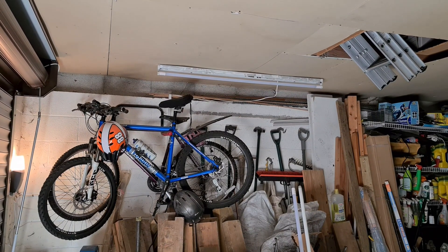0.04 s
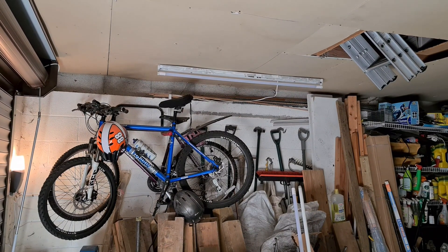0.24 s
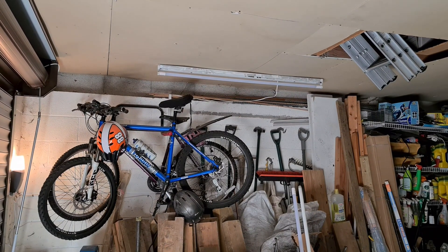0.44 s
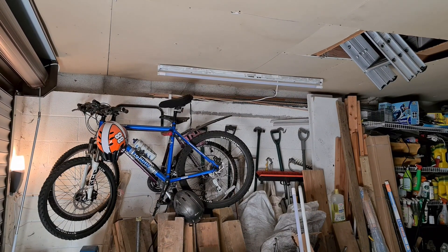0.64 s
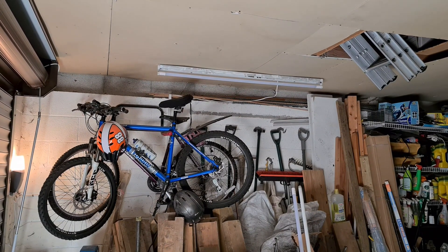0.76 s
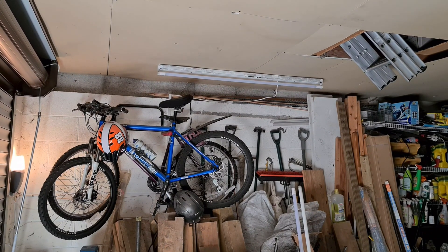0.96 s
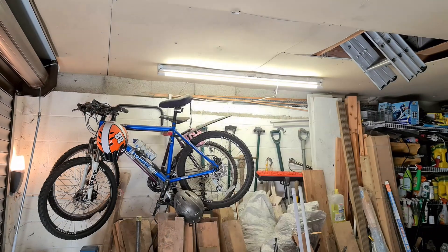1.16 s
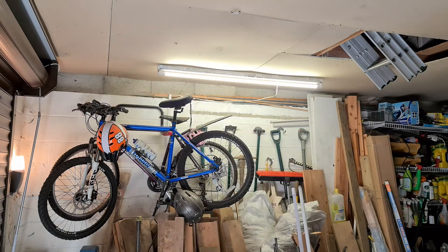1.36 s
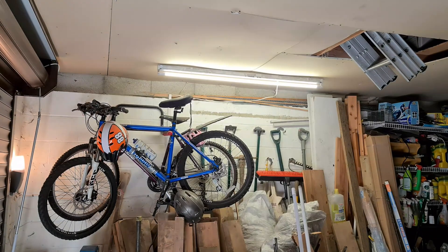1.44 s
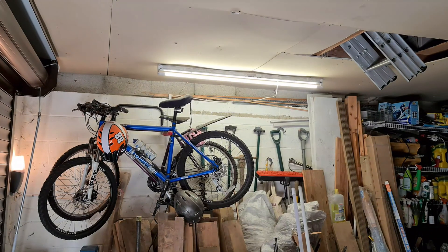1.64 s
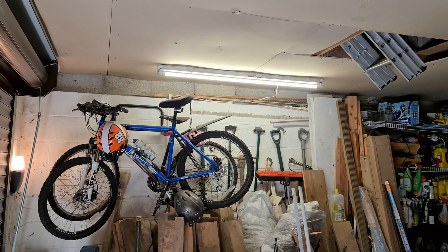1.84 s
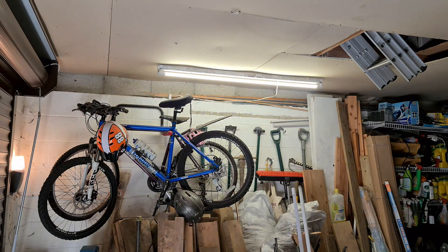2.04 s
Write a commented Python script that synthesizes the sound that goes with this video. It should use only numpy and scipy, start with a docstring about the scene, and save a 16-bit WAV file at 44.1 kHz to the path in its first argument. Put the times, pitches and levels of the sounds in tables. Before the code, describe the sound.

One crisp light switch click with a short bright room tail, over faint low rumble

```python
"""A plastic wall switch snaps over once in a cluttered garage: a tick, then three contacts within a few milliseconds.
Each contact is a sharp push with gritty noise; damped sines ring the rocker, cover plate and wall box.
Decaying noise makes the scatter off nearby things and the short bright tail of the room.
Behind lie a wavering low boom, noise layers of rumble, drone and dull wash, all easing off unevenly,
a weak sine of mains hum, a thin hiss and one faint rustle."""
import sys
import numpy as np
from scipy import signal
from scipy.fft import rfft, irfft, next_fast_len
from scipy.io import wavfile
from scipy.ndimage import uniform_filter1d

SR = 44100
rng = np.random.default_rng(int(sys.argv[2]) if len(sys.argv) > 2 else 0)


def unload_wav(signal):
    """Save mono or channel-first audio to the path in sys.argv[1] as 16-bit WAV at rate SR, clipped to [-1, 1]."""
    wavfile.write(
        sys.argv[1],
        SR,
        np.round(np.clip(np.atleast_2d(signal).T, -1, 1) * 32767).astype(np.int16),
    )


N = 92345  # length [samples]

# uneven easing of the background: (time [s], drone level [dB], wash level [dB])
BACKGROUND_LEVELS = [(0, -51, -61), (.13, -53, -59.5), (.22, -51, -58.5), (.3, -60.5, -58),
                     (.38, -51.5, -58.5), (.47, -61, -57), (.68, -48.5, -57.5), (.8, -59, -59.5),
                     (.9, -53, -61), (.98, -59.5, -63.5), (1.08, -56.5, -61.5), (1.25, -66, -65),
                     (1.4, -61, -67), (1.7, -63.5, -64.5), (1.88, -62.5, -64.5), (2.09, -63, -64.5)]


def amp(db):
    """Decibels to gain."""
    return 10 ** (np.asarray(db) / 20)


def unit(x):
    """Scale to rms 1."""
    return x / np.sqrt(np.mean(x ** 2) + 1e-20)


def along(points, hz):
    """Read (frequency, value) points on a log frequency axis."""
    f, v = np.transpose(points)
    return np.interp(np.log(hz + 1), np.log(f + 1), v)


def curves(rows):
    """Draw one value per sample for each column after the time."""
    times, *columns = np.transpose(rows)
    return [np.interp(np.arange(N) / SR, times, column) for column in columns]


def filtered(x, response):
    """Shape the spectrum of x by a response of frequency."""
    m = next_fast_len(N + SR // 2)
    return irfft(rfft(x, m) * response(np.fft.rfftfreq(m, 1 / SR)), m)[..., :N]


def coloured(x, gain_db, size=4096):
    """Filter x causally (minimum phase) with the given dB response, so nothing sounds before its onset."""
    cepstrum = irfft(np.log(amp(gain_db(np.fft.rfftfreq(size, 1 / SR)))))
    # folding the cepstrum forward in time gives minimum phase
    fold = np.r_[1, np.full(size // 2 - 1, 2), np.zeros(size // 2)]
    kernel = irfft(np.exp(rfft(cepstrum * fold)))
    return signal.fftconvolve(x, kernel[None], axes=1)[:, :x.shape[1]]


def fade(t, t60):
    """Decay exponentially by 60 dB in t60 seconds."""
    return np.exp(-np.log(1000) * t / np.maximum(t60, 1e-4))


def tone(hz):
    """A sine of rms 1 that follows a pitch curve."""
    phase = 2 * np.pi * np.cumsum(hz) / SR
    return np.sqrt(2) * np.sin(phase + rng.uniform(0, 2 * np.pi))


def rush(spectrum):
    """Stereo noise of rms 1, nearly mono in the bass and wide in the treble."""
    # left-right likeness: (frequency [Hz], correlation [-1 to 1])
    likeness = [(60, .99), (150, .93), (300, 0.8), (600, 0.63), (1200, 0), (8000, 0.0072)]

    def mid_side_response(hz):
        turn = np.arccos(np.clip(along(likeness, hz), -1, 1)) / 2
        return amp(along(spectrum, hz)) * [np.cos(turn), np.sin(turn)]

    mid, side = filtered(rng.standard_normal((2, N)), mid_side_response)
    return unit(np.array([mid + side, mid - side]))


def patchy(x, depth_db):
    """Give x drifting patches of random gain over time and frequency."""
    z = signal.stft(x, nperseg=2048)[2]
    field = rng.standard_normal(z.shape[1:])
    field = uniform_filter1d(field, size=3, axis=0)  # over frequency
    field = uniform_filter1d(field, size=5, axis=1)  # over time
    return unit(signal.istft(z * amp(depth_db * unit(field)), nperseg=2048)[1][:, :N])


def ring(modes, t):
    """Damped modes at two microphones, each with its own phase."""
    phases = rng.uniform(0, 2 * np.pi, (len(modes), 2, 1))
    total = 0
    for (hz, db, t60), phase in zip(modes, phases):
        total = total + amp(db) * fade(t, t60) * np.sin(2 * np.pi * hz * t + phase)
    return total


def answer(x, tail):
    """Convolve x with a stereo tail of energy 1 in each channel."""
    tail = tail / np.linalg.norm(tail, axis=1, keepdims=True)
    return signal.fftconvolve(x, tail, axes=1)[:, :x.shape[1]]


def hiss():
    """Thin, steady noise, mostly treble."""
    # spectrum: (frequency [Hz], level [dB])
    hiss_spectrum = [(500, -17.5), (2500, 7.5), (4500, 3), (7000, -3.5), (8600, 3), (10000, -0.5),
                     (11500, 2), (13500, -1), (16000, -7)]
    # (time [s], level [dB])
    hiss_levels = [(0, -77.5), (1, -78.5), (1.4, -82), (2.09, -80)]
    return amp(curves(hiss_levels)[0]) * rush(hiss_spectrum)


def hum():
    """A weak mains hum: one steady sine."""
    hum_hz, hum_db = 99.5, -70
    return amp(hum_db) * tone(np.full(N, hum_hz))


def rumble():
    """Noise at the bottom of the range, slowly easing off."""
    # spectrum: (frequency [Hz], level [dB])
    rumble_spectrum = [(15, -12), (33, 0), (46, -4.5), (70, 0), (100, 2.5), (130, -10), (250, -34),
                       (600, -88)]
    # (time [s], level [dB])
    rumble_levels = [(0, -54), (.55, -52.5), (.9, -58.5), (1.3, -56.5), (1.65, -59), (2.09, -60.5)]
    return amp(curves(rumble_levels)[0]) * rush(rumble_spectrum)


def drone():
    """A band of low noise that pulses and eases off, with patchy gain."""
    # spectrum: (frequency [Hz], level [dB])
    drone_spectrum = [(60, -24.5), (110, -11.5), (160, 2.5), (205, 0), (260, -8.5), (350, -18.5),
                      (600, -49), (1500, -79.5)]
    patchy_db = 1.8  # rms
    drone_db, _ = curves(BACKGROUND_LEVELS)
    return amp(drone_db) * patchy(rush(drone_spectrum), patchy_db)


def wash():
    """A dull band of noise that swells, then eases off, with patchy gain."""
    # spectrum: (frequency [Hz], level [dB])
    wash_spectrum = [(150, -20), (330, -9), (430, 1), (560, -3.5), (700, -2), (800, 2), (930, 4), (1100, 1),
                     (1300, -5.5), (1800, -11), (2500, -23.5), (4000, -38.5), (8000, -57.5)]
    patchy_db = 1.8  # rms
    _, wash_db = curves(BACKGROUND_LEVELS)
    return amp(wash_db) * patchy(rush(wash_spectrum), patchy_db)


def boom():
    """A low sine whose pitch wavers at random and whose level comes in swells."""
    # swells: (time [s], level [dB])
    boom_levels = [(0, -39), (.05, -52), (.11, -58), (.22, -65), (.27, -45.5), (.36, -61.5), (.43, -46.5),
                   (.7, -49), (.76, -74), (.9, -51), (1.02, -71), (1.25, -57.5), (1.5, -72), (2.09, -78)]
    boom_hz, wander_hz = 58.8, 3.9
    wander = np.interp(np.arange(N), np.linspace(0, N, 20), rng.standard_normal(20))
    return amp(curves(boom_levels)[0]) * tone(boom_hz + wander_hz * wander)


def rustle():
    """A faint, brief rustle well before the click: noise that rises and dies exponentially."""
    # spectrum: (frequency [Hz], level [dB])
    rustle_spectrum = [(1000, -29), (2400, -8), (3300, 5.5), (4800, -4), (6000, -11), (9000, -11),
                       (15000, -16)]
    peak_s, peak_db = 0.22, -69.5
    rise_s, t60_s = 0.042, 0.26  # rise is a time constant
    t = np.arange(N) / SR - peak_s
    rise = np.exp(np.minimum(t, 0) / rise_s)
    return amp(peak_db) * rise * fade(np.maximum(t, 0), t60_s) * rush(rustle_spectrum)


def garage(x):
    """A diffuse tail that builds up, then dies fastest in the high treble."""
    # decay: (frequency [Hz], t60 [s])
    room_t60 = [(300, .2), (1000, .21), (2600, .22), (6000, .205), (11000, .2), (15500, .18)]
    # tail colour: (frequency [Hz], gain [dB])
    room_colour = [(300, -15), (1000, -5.5), (2150, -1), (2400, 0.5), (3200, 0), (4300, 0), (5800, 2.5),
                   (7000, 0), (11000, 0.5), (12500, -4.5), (15500, 0)]
    room_db, delay_s, build_s = 1, .002, .016  # build-up is a time constant
    hz, t, z = signal.stft(rng.standard_normal((2, SR // 2)), SR, nperseg=256)
    tail = signal.istft(z * fade(t, along(room_t60, hz)[:, None]), SR, nperseg=256)[1]
    age = np.maximum(np.arange(tail.shape[1]) / SR - delay_s, 0)
    wet = answer(x, tail * (1 - np.exp(-age / build_s)))
    return amp(room_db) * coloured(wet, lambda hz: along(room_colour, hz))


def near_scatter(x):
    """Dense early reflections from the wall and things beside the switch."""
    near_db, delay_s, t60_s = 2.5, .0004, .022
    t = np.arange(SR // 10) / SR
    tail = rng.standard_normal((2, len(t))) * fade(t, t60_s) * (t > delay_s)
    return amp(near_db) * answer(x, tail)


def crack(t):
    """Contact noise: one sharp push, then quickly dying grit."""
    # spectrum: (frequency [Hz], level [dB])
    crack_spectrum = [(100, -36), (280, -21), (420, -10), (1000, -6.5), (2000, -1), (2700, -4), (5000, -2),
                      (7000, -4), (12000, -5), (14000, -10), (16000, -11)]
    grit, grit_t60_s = 0.19, .004  # grit is relative to the push
    noise = rng.standard_normal((2, len(t))) * fade(t, grit_t60_s)
    push = (t == 0) + grit * noise
    return coloured(push, lambda hz: along(crack_spectrum, hz))


def plate(t):
    """The rocker and cover plate ring in short bright modes."""
    # modes: (frequency [Hz], relative level [dB], t60 [s])
    plate_modes = [(2434, -11, 0.033), (2683, -4.5, 0.024), (2980, -14, 0.013), (3490, -14, 0.02),
                   (3950, -6, .014), (4830, -3.5, .012), (6100, -10, 0.02), (6580, -9.5, 0.0098),
                   (7383, -5, 0.0067), (9580, -10, .008), (11900, -4, .008), (12520, -2.5, .007)]
    return ring(plate_modes, t)


def wall_box(t):
    """The wall box knocks in lower modes."""
    # modes: (frequency [Hz], relative level [dB], t60 [s])
    box_modes = [(450, -2.5, .05), (714, -3, 0.087), (846, 2.5, 0.031), (1110, -2.5, 0.039),
                 (1387, -4, 0.022), (1900, 2, .012)]
    return ring(box_modes, t)


def blow(peak_hz, emphasis_db):
    """One contact: crack, plate and box together, lifted around the contact's own peak frequency."""
    crack_db, plate_db, box_db = -6.5, -29.5, -39
    width_octaves = .5
    t = np.arange(SR // 5) / SR
    sound = amp(crack_db) * crack(t) + amp(plate_db) * plate(t) + amp(box_db) * wall_box(t)

    def emphasis(hz):
        octaves = np.log2((hz + 1) / peak_hz)
        return emphasis_db * np.exp(-.5 * (octaves / width_octaves) ** 2)

    return coloured(sound, emphasis)


def switch():
    """Every contact arrives directly, off nearby things and through the room."""
    # rocker contacts: (time [s], relative level [dB], peak frequency [Hz], emphasis there [dB],
    # left over right [dB])
    contacts = [(1.1398, -14, 5000, 3, -2), (1.1416, -1, 2800, 10, -2), (1.1431, -2, 12000, 9, 4),
                (1.1444, -1, 4700, 9, 0)]
    out = np.zeros((2, N))
    for time_s, db, peak_hz, emphasis_db, left_db in contacts:
        hit = amp(db) * blow(peak_hz, emphasis_db)
        hit = np.pad(hit, ((0, 0), (0, SR // 3)))  # space for the tail
        balance = amp([[left_db / 2], [-left_db / 2]])
        heard = (hit + near_scatter(hit)) * balance + garage(hit)
        start = round(time_s * SR)
        out[:, start:start + heard.shape[1]] += heard
    return out


def scene():
    """The click in its room, over the quiet background."""
    background = hiss() + hum() + rumble() + drone() + wash()
    return background + boom() + rustle() + switch()


def record(dry):
    """Cut nearly everything above the band limit with a very steep low-pass."""
    top_hz = 15800
    return filtered(dry, lambda hz: 1 / np.sqrt(1 + (hz / top_hz) ** 700))


dry = scene()
out = record(dry)
unload_wav(out)
```